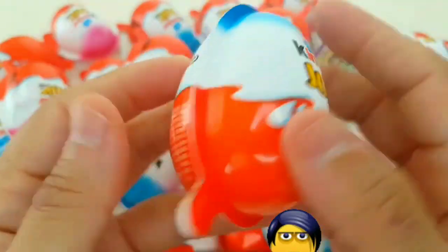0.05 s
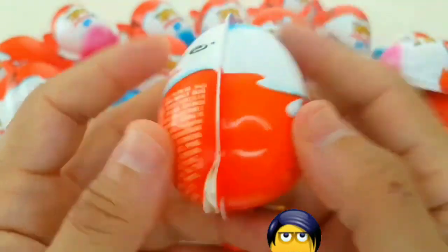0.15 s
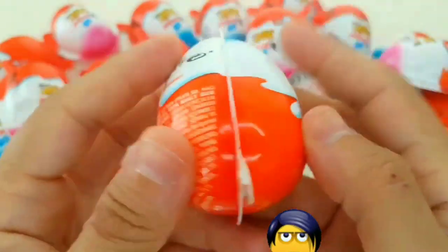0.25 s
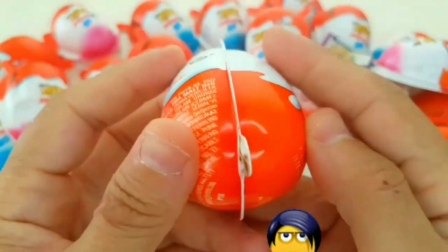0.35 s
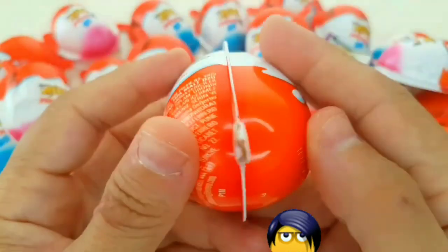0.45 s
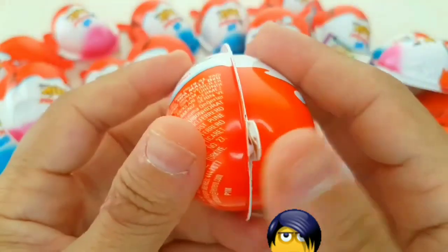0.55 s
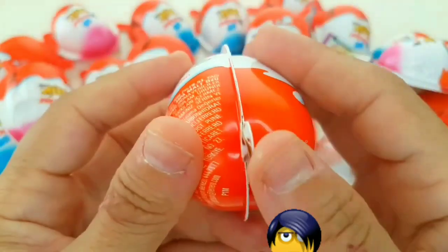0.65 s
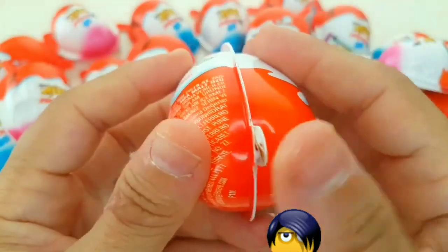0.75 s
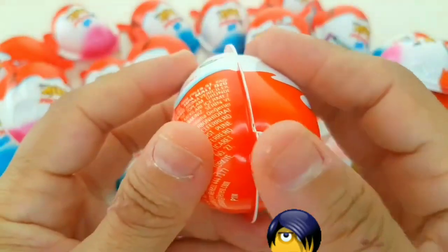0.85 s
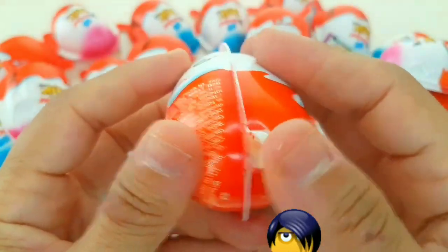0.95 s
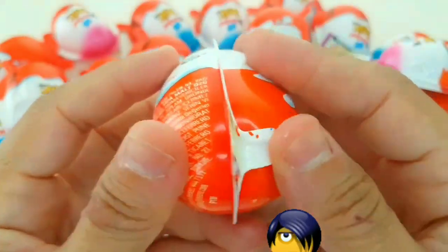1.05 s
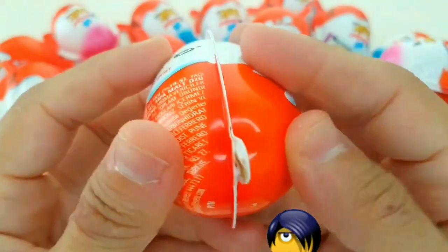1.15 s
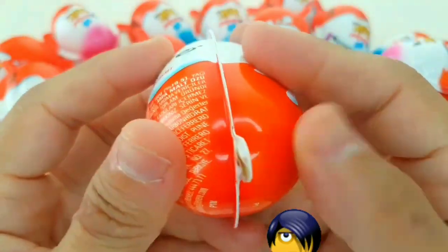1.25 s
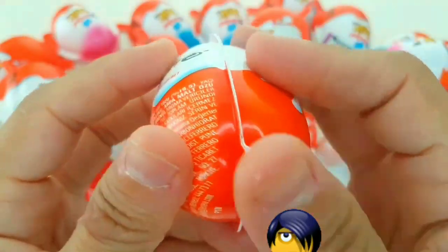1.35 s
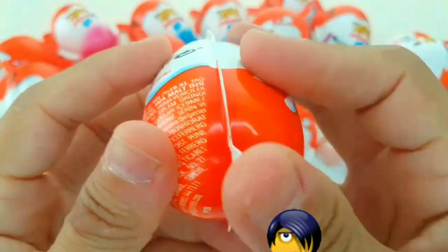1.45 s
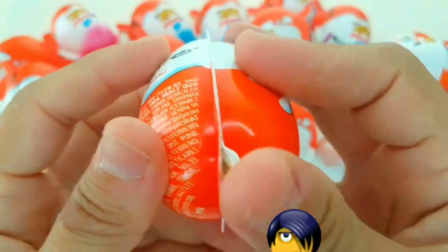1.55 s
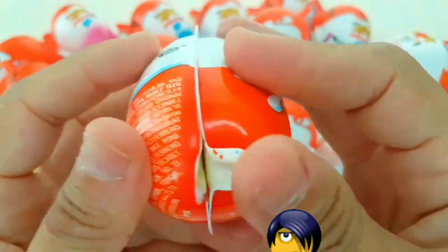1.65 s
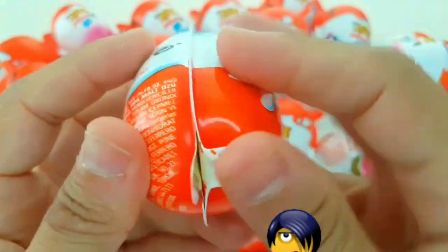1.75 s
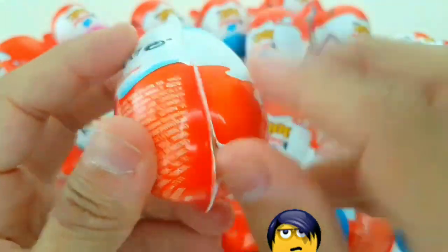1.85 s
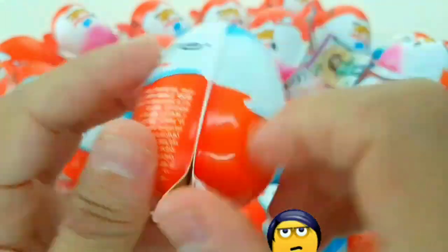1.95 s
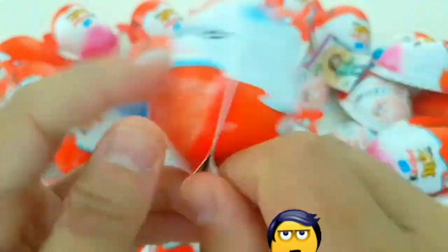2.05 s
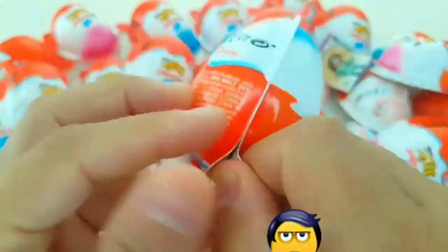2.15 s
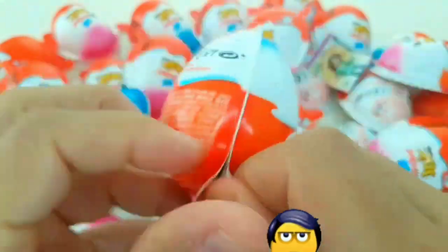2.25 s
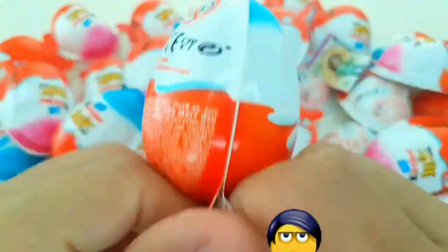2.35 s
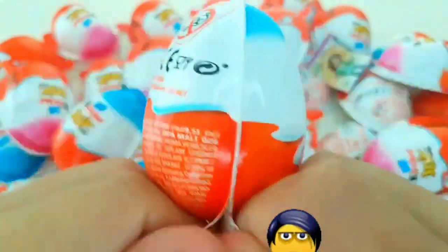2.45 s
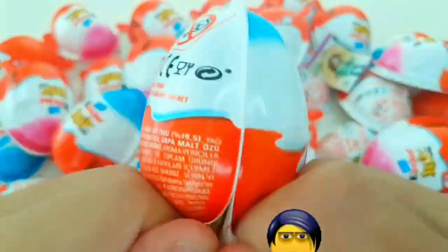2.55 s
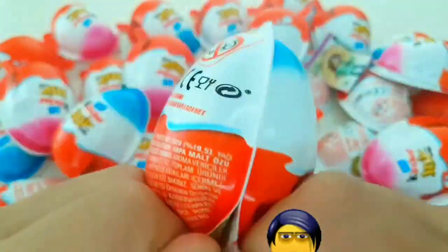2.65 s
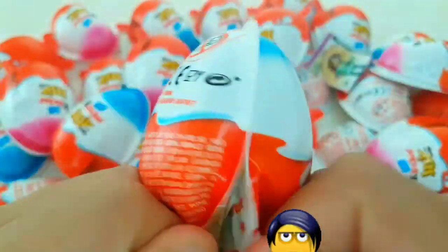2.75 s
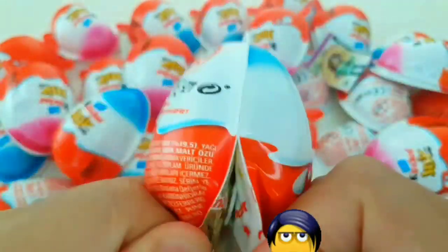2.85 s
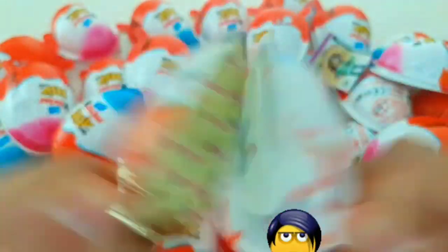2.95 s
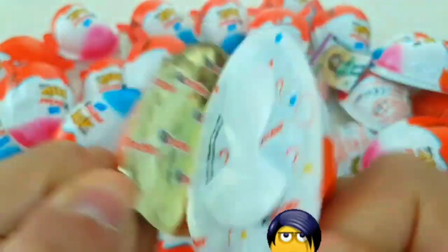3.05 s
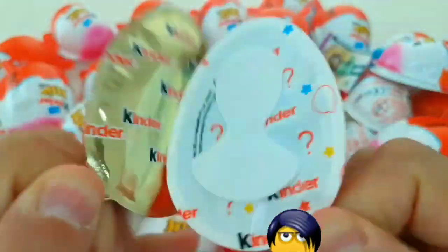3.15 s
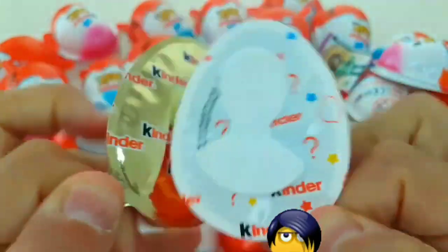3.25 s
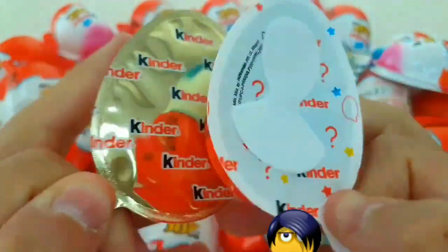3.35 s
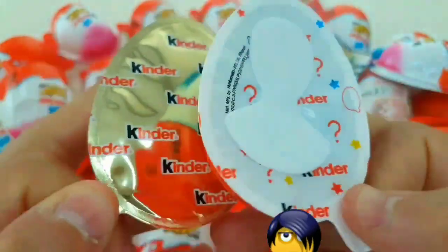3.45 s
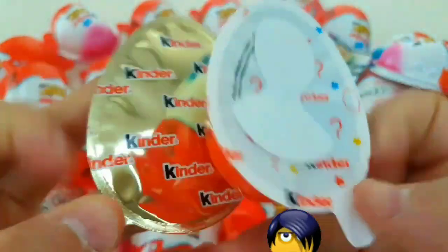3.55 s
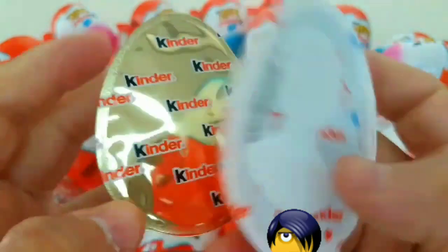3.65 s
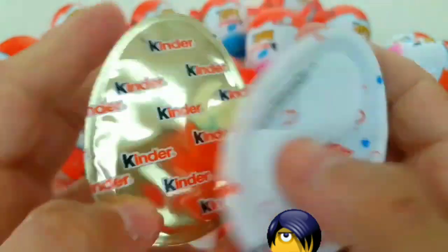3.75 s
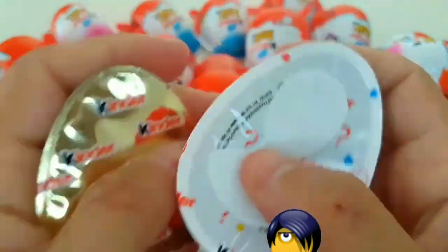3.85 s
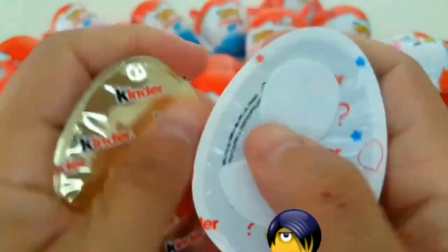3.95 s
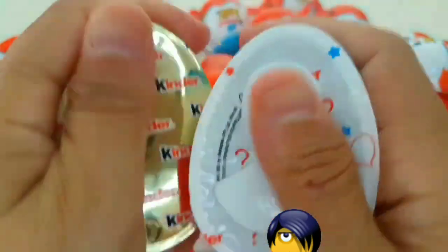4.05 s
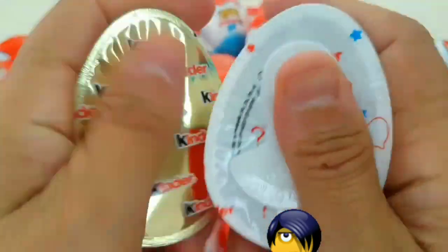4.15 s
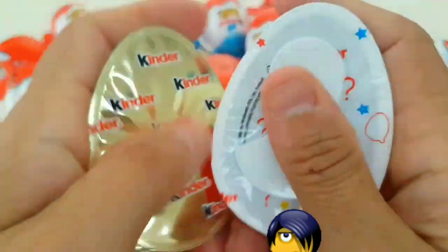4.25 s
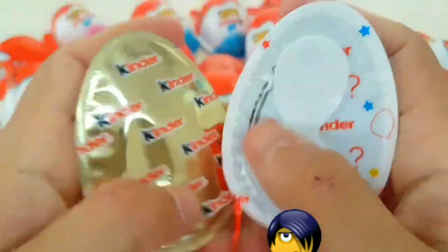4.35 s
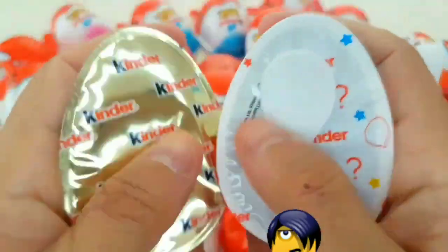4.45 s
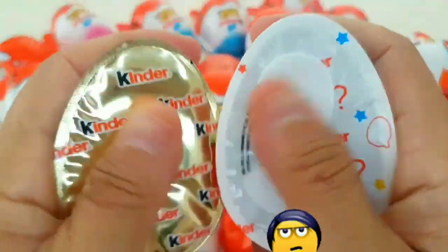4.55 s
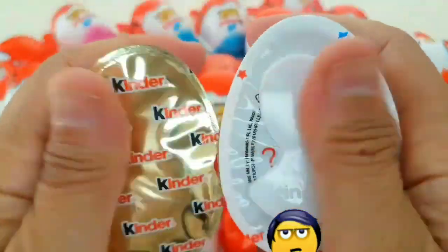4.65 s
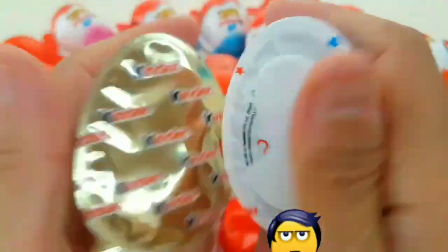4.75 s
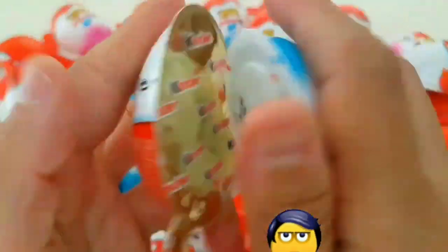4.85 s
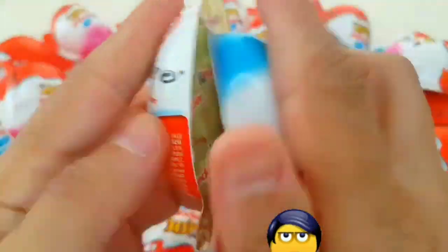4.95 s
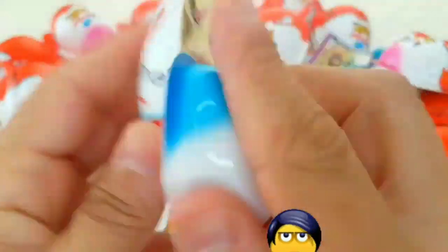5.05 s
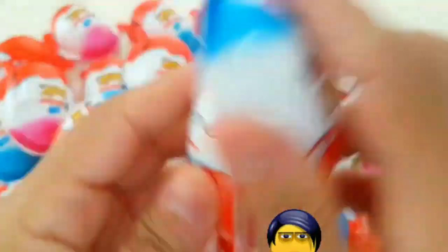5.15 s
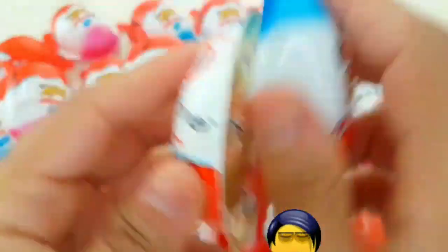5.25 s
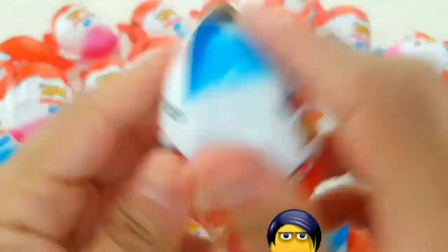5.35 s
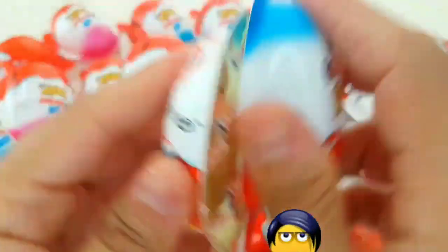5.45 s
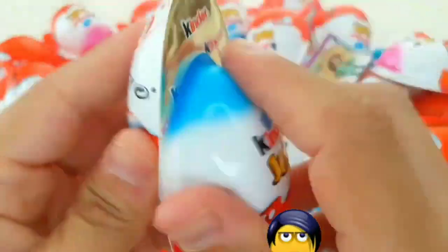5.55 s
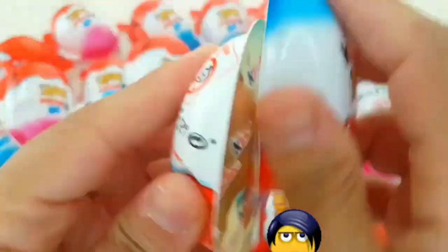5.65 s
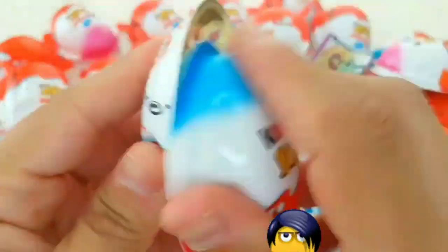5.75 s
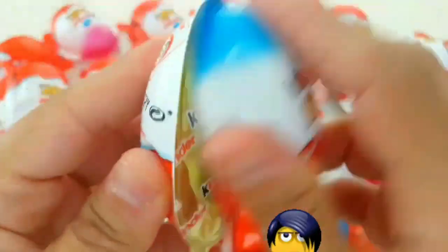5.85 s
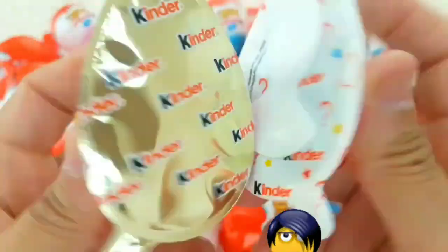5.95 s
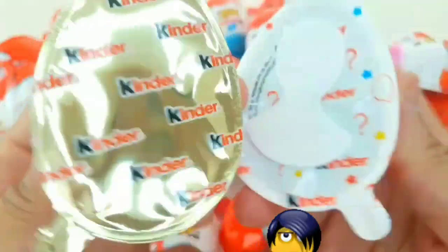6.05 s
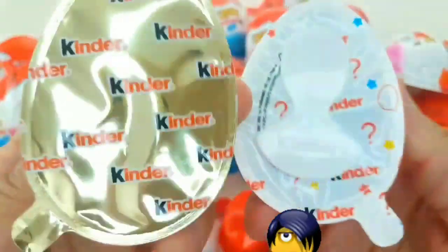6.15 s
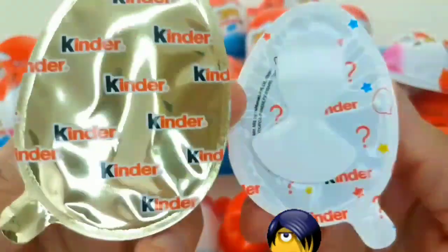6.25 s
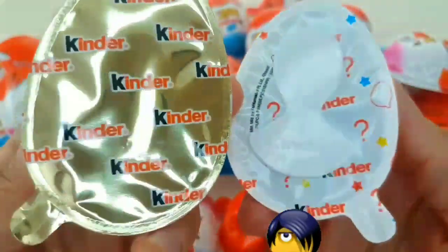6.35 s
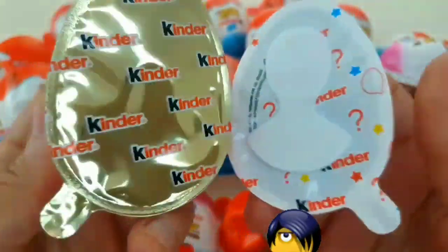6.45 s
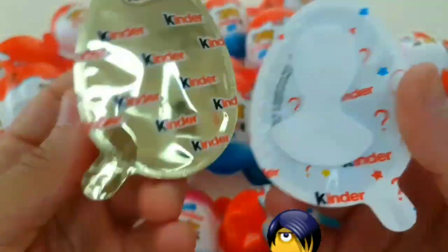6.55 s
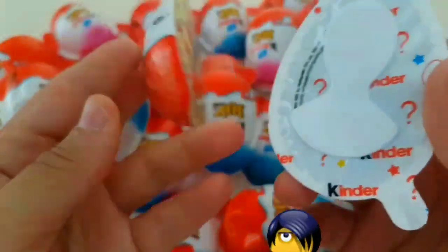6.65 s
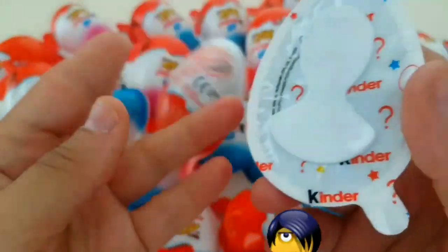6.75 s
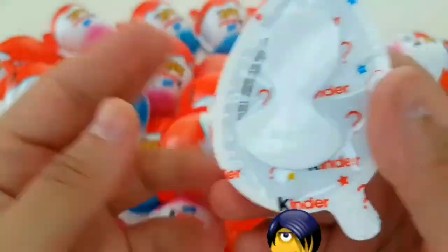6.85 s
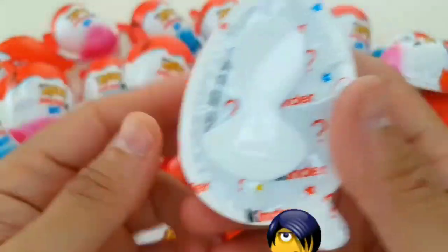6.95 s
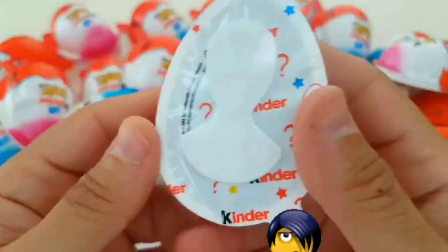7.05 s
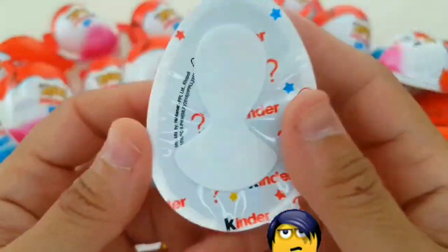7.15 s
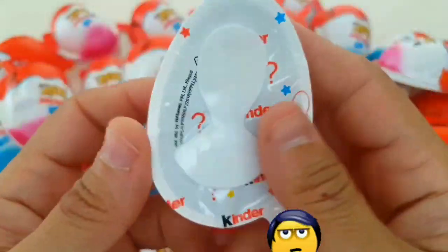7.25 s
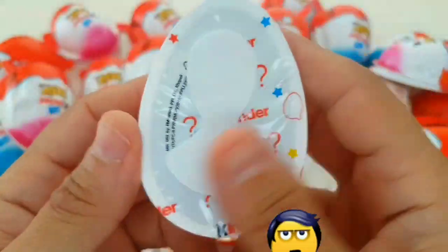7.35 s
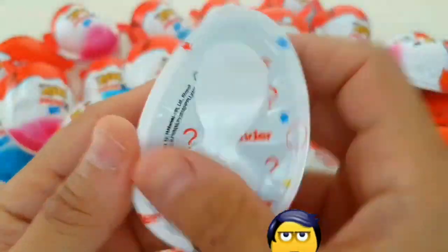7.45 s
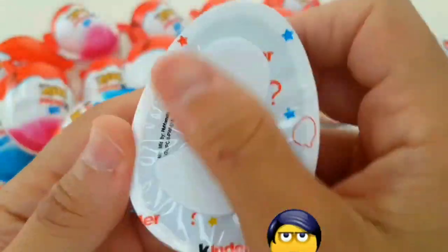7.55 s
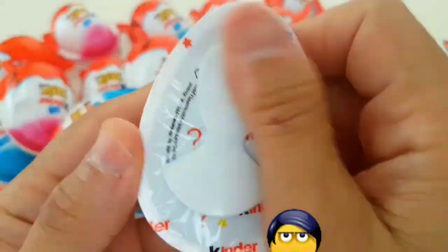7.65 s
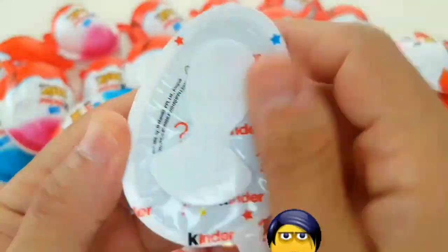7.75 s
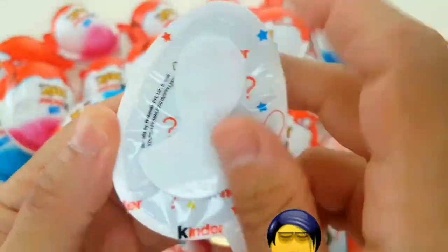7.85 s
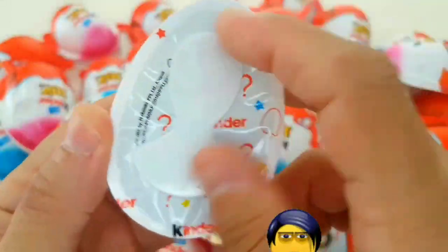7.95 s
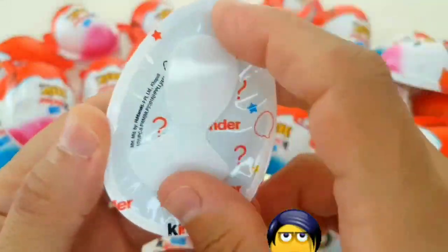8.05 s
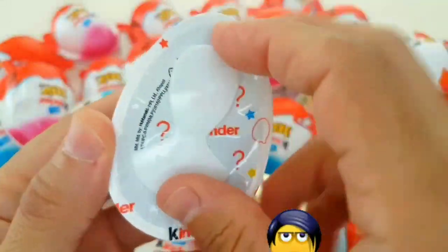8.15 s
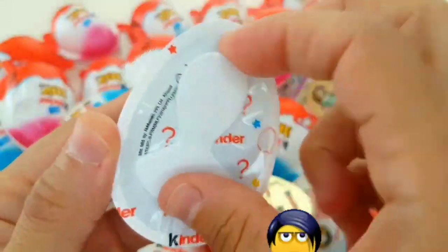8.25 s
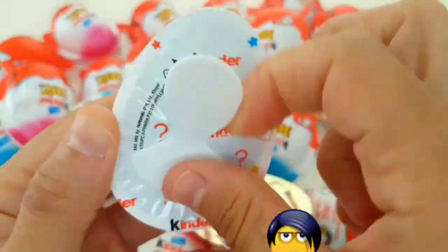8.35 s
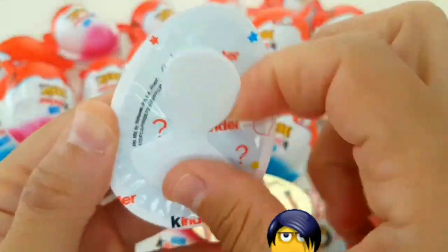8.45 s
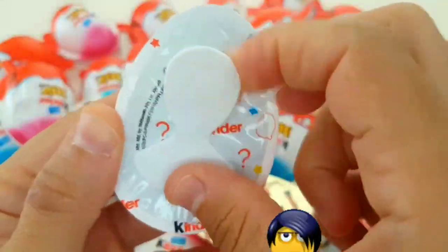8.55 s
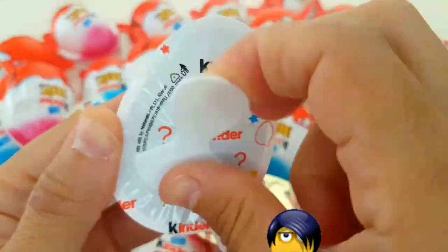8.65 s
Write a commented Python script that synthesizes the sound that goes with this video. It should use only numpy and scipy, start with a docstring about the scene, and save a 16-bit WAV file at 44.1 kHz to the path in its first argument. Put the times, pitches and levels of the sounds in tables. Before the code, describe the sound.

After near silence with two small pops, a loud plastic snap, then dense bright crackles and clicks of thin plastic and foil, dry and close.

```python
"""Thin plastic walls of a toy egg buckle close to a stereo microphone, as hands peel its seal, snap it open and
turn it. Each buckle rings for a few cycles under a short noise crack and a bright tick; foil snaps are mostly
crack. Between them random slips and creases make rubbing and crinkling, and the peeling film squeaks faintly
once. Cups knock on a table and puffs of air thump. Decaying noise adds a small bare room, over room tone and
rumble."""
import sys
import numpy as np
from scipy import signal
from scipy.fft import rfft, irfft, next_fast_len
from scipy.io import wavfile

SR = 44100
rng = np.random.default_rng(int(sys.argv[2]) if len(sys.argv) > 2 else 0)


def wav_record(signal):
    """Record a signal, one row per channel, as 16-bit PCM in the file named by sys.argv[1]."""
    frames = np.transpose(np.atleast_2d(signal))
    bounded = np.clip(frames, -1, 1)
    # unit amplitude maps onto the largest positive 16-bit level
    quanta = np.round(bounded * 32767).astype(np.int16)
    wavfile.write(sys.argv[1], SR, quanta)


N = 383229
TIME_S = np.arange(N) / SR
SHORT_S = np.arange(2048) / SR

# Buckles of the plastic walls. Each row: time in seconds, ring in Hz, ring level in dB, crack over ring in dB.
BUCKLES = [(1.0414, 4040, -23.5, -10), (1.1745, 1450, -20, -6.5), (2.4999, 1030, -35.5, -2.5),
           (2.705, 1430, -40.5, 5), (2.7706, 1400, -34.5, -4.5), (2.7803, 1800, -33, 0),
           (2.8063, 1300, -31.5, -4), (2.9864, 1650, -23.5, 5), (3.0258, 1455, -8, -5.5),
           (3.0514, 1540, -19, -5.5), (3.1207, 890, -21, -9), (3.249, 2480, -29.5, -2),
           (3.2772, 1900, -29, -5), (3.295, 1520, -30.5, 3.5), (3.3092, 1920, -34, 6),
           (3.431, 1500, -45, -15), (3.7996, 1034, -29.5, -3), (3.9186, 1680, -22, 2),
           (3.9844, 1910, -23.5, 3), (4.054, 2100, -20.5, -2.5), (4.0948, 1670, -28.5, 4),
           (4.1462, 1580, -20.5, -6), (4.2447, 2100, -27, -10), (4.2682, 1270, -28.5, 5),
           (4.33, 1100, -30, 8.5), (4.3928, 2200, -21, -3), (4.4004, 1820, -19, -15),
           (4.4178, 1930, -19.5, -6.5), (4.6142, 2260, -23, -18), (4.6589, 1650, -19, -7.5),
           (4.6711, 2085, -18, -6.5), (4.7074, 1900, -19, -9), (4.728, 1480, -25, 4),
           (4.7986, 1840, -15.5, -1), (4.8149, 1670, -20, -10), (4.8475, 1710, -19.5, -2),
           (4.8881, 1530, -20, -28), (4.9026, 1660, -11.5, -9.5), (4.92, 1650, -18, -13.5),
           (5.0097, 1680, -16.5, -4), (5.0238, 1600, -23.5, -7), (5.0782, 1350, -29.5, 1.5),
           (5.0917, 1670, -20, -9.5), (5.1047, 1400, -24.5, -3), (5.1247, 1420, -18.5, 0.5),
           (5.1523, 1840, -14, -2), (5.2145, 1200, -14.5, -1.5), (5.258, 1800, -13, -6.5),
           (5.2873, 1500, -12.5, -5.5), (5.3147, 880, -14, -11.5), (5.351, 950, -22.5, -11.5),
           (5.3957, 1790, -12.5, -5), (5.4082, 1740, -12, -11), (5.4185, 1880, -16, -12),
           (5.442, 1600, -22.5, -5.5), (5.4702, 2080, -16, -4), (5.531, 1340, -20.5, -12),
           (5.547, 1990, -14, -24), (5.625, 2050, -16, -5.5), (5.65, 1830, -14, -1.5),
           (5.7358, 1460, -13.5, -8), (5.8386, 2340, -11, -20.5), (5.869, 2070, -19, -5),
           (5.9005, 2220, -16, -9.5), (5.9578, 1340, -21.5, -10.5), (6.0046, 1740, -12.5, -10),
           (6.2328, 710, -36.5, -6), (6.2774, 1630, -30.5, 12.5), (6.3334, 1180, -28.5, 5.5),
           (6.8686, 1710, -19.5, -25), (6.886, 1750, -22.5, -7.5), (6.912, 1660, -19.5, -14),
           (6.9445, 790, -21, -8.5), (7.0491, 1770, -20, -16.5), (7.155, 1740, -32.5, -30),
           (7.4494, 850, -24.5, -11.5), (7.6021, 1820, -27, -3.5), (7.726, 1830, -29.5, 0),
           (7.7499, 1410, -15.5, 1.5), (7.8188, 1680, -20.5, -38), (8.3774, 970, -20, -3.5),
           (8.4001, 924, -17.5, -1), (8.447, 1560, -17, -6), (8.597, 1310, -24, 1),
           (8.6467, 1640, -13, -5.5), (8.6725, 1540, -14, -3), (8.6844, 1530, -20, 3)]
# Cracks of the foil and its seal. Each row: time in seconds, crack level in dB, tick level in dB.
FOIL_CRACKS = [(1.04, -28.5, -17), (1.1227, -46.5, -25.5), (1.1732, -16.5, -9.5), (1.2386, -18.5, -16.5),
               (1.6128, -60, -46.5), (2.5914, -36, -34.5), (2.686, -46.5, -32.5), (2.8443, -15.5, -21.5),
               (2.852, -21, -13), (2.8606, -17, -11.5), (2.87, -22, -19), (2.9198, -34.5, -17.5),
               (3.0064, -21.5, -12), (3.0147, -29, -24), (3.141, -23, -25), (3.1676, -22, -24),
               (4.1278, -13, -19.5), (4.3702, -24, -35), (4.4603, -26.5, -27.5), (4.7935, -18.5, -25),
               (5.1876, -21, -19), (5.233, -18, -16), (5.376, -19, -19), (5.678, -25, -18.5),
               (5.847, -20.5, -23), (5.863, -22.5, -26), (6.024, -18, -30), (6.0725, -12, -16.5),
               (6.517, -22, -30.5), (6.8265, -30.5, -34), (7.4498, -47, -31), (8.0011, -14, -23.5),
               (8.259, -33.5, -19), (8.4336, -25, -20), (8.5252, -19.5, -33), (8.5851, -17.5, -21)]
# Send of each snap to the room, as the cups are turned. Each row: time in seconds, send in dB.
FACING_SENDS = [(1.05, -5.5), (1.24, -3), (2.85, -5), (3.1, -15), (3.8, -4), (4.1, -14), (5.3, -2),
                (6.3, -1), (6.5, -14.5), (7.75, -9.5), (8.0, -8.5), (8.5, -17.5), (8.65, 0)]
# Crack spectrum. Each row: frequency in Hz, relative level in dB.
CRACK_SPECTRUM = [(200, -12.5), (700, -7), (2000, 2.5), (3600, 6), (6000, -5.5), (8500, -15),
                  (16000, -32.5)]
# Tick spectrum. Each row: frequency in Hz, relative level in dB.
TICK_SPECTRUM = [(3000, -15), (7000, -2), (10000, -5), (13200, -1.5), (16000, -2.5)]
# Finger strokes over shell and foil. Each row: end of swell in seconds, length in seconds, level in dB,
# brightness (gain above the 2.6 kHz split) in dB.
STROKES = [(0.01, 0.062, -56.5, 6), (0.188, 0.045, -52.5, 4.5), (0.25, 0.51, -68.5, 1.5),
           (1.843, 0.029, -61.5, 7), (1.968, 0.24, -60.5, 6.5), (2.358, 0.65, -65, 3),
           (2.851, 0.027, -31.5, 3.5), (3.018, 0.034, -18, 2), (3.083, 0.076, -31.5, -1),
           (3.277, 0.012, -40, -6), (3.551, .03, -59, -2), (3.639, 0.019, -55, 5.5),
           (3.796, 0.93, -51, -4.5), (4.003, 0.11, -36.5, -5.5), (4.337, .08, -32, -9), (4.46, 1, -47, -3),
           (5.141, 0.32, -25, -3.5), (5.492, 0.12, -36, 1), (5.628, 0.19, -32, -6),
           (5.833, 0.035, -32.5, 4), (5.922, 0.18, -40.5, -4), (6.727, 0.017, -56, 6.5),
           (6.826, 0.17, -33, -16), (6.992, 0.17, -48, -14.5), (7.18, 0.73, -57.5, -7),
           (7.526, 0.43, -55, -1.5), (8.205, 0.018, -49.5, 0), (8.373, 0.15, -39, -10),
           (8.635, .06, -35.5, -2.5)]
# Rubbing spectrum. Each row: frequency in Hz, relative level in dB.
FRICTION_SPECTRUM = [(150, -22), (400, -17), (800, -3.5), (1600, -4), (2800, 0.5), (10000, -6.5),
                     (13500, -4.5), (16000, -19.5)]
# Dull knocks of cups and knuckles. Each row: time in seconds, pitch in Hz, knock level in dB, table gain in dB.
KNOCKS = [(1.174, 380, -39, -55), (1.239, 400, -31.5, -65), (3.026, 235, -10, -63), (3.051, 200, -24, -69),
          (6.821, 173, -28.5, -41), (6.945, 340, -26, -40), (7.048, 208, -41.5, -76),
          (7.156, 310, -30, -60), (7.448, 410, -27, -40.5)]
# Table modes. Each row: frequency in Hz, relative level in dB, 60 dB decay in seconds.
TABLE_MODES = [(70, -5, .45), (114, 0, .7), (146, -4, .4)]
# Air pushed at the microphone as the halves part. Each row: time in seconds, pitch in Hz, level in dB.
PUFFS = [(3.0267, 125, -5), (3.052, 70, -20.5)]
# Room echo spectrum. Each row: frequency in Hz, relative level in dB.
ROOM_COLOUR = [(200, -1), (1200, -4.5), (3500, -6.5), (14000, -6.5)]
# Room decay. Each row: frequency in Hz, 60 dB decay in seconds.
ROOM_T60_S = [(200, 0.32), (3000, 0.31), (14000, 0.28)]
# Room tone spectrum. Each row: frequency in Hz, relative level in dB.
ROOM_TONE_SPECTRUM = [(15, -19), (28, 5), (55, -14), (130, -31), (240, -8.5), (350, -10), (550, -15.5),
                      (1200, -20.5), (9000, -31.5), (15000, -28.5)]
# Rumble of the hands over time. Each row: time in seconds, gain in dB.
HANDS_GAIN = [(0.0, -79), (0.41, -78), (1.26, -73.5), (2.49, -60), (2.98, -51.5), (3.48, -88.5),
              (5.52, -56), (6.02, -52), (6.75, -77.5), (6.97, -53.5), (8.03, -64), (8.69, -61)]
# Rumble spectrum. Each row: frequency in Hz, relative level in dB.
RUMBLE_SPECTRUM = [(20, -4), (60, 3.5), (110, 0.5), (250, 1), (450, -11), (1000, -28), (4000, -66.5)]

LEAD_S = .003  # short noise rise before the crack's peak
PORT_LAG_S = .00016  # sound reaches the left port first
FOIL_RING_HZ, FOIL_RING_RE_CRACK_DB = 1596, -14  # wall under the foil
BUCKLE_TICK_RE_CRACK_DB = -10.5
STROKE_ATTACK_S, STROKE_RELEASE_S, STROKE_SAG_DB = 0.018, 0.037, -0.5
RESTING_DB = -83  # fingers that only hold the egg
ROOM_TONE_DB, RUMBLE_BASE_DB = -62, 3
TOP_HZ = 15600


def snaps():
    """All snaps, close up, and what each throws into the room as its wall faces."""
    near, thrown = np.zeros((2, N)), np.zeros(N)
    # summed over all directions, a crack has a smooth spectrum
    impulse = signal.unit_impulse(len(SHORT_S), 32)
    crack = burst(colour(impulse, CRACK_SPECTRUM), 0)
    tick = burst(colour(impulse, TICK_SPECTRUM), 0)
    for s, hz, ring_db, crack_db, tick_db in snap_parts():
        add(near, s - LEAD_S, snap(hz, ring_db, crack_db, tick_db))
        send_db = np.interp(s, *np.transpose(FACING_SENDS))
        wall = burst(ring(hz, cycles=11.0), ring_db - 6.5)  # the wall's ring, slightly shorter, as sent to the room
        whole = wall + crack * undb(crack_db) + tick * undb(tick_db)
        add(thrown, s, whole * undb(send_db))
    return near, thrown


def snap_parts(pitch_spread=0.16):
    """Each snap as (s, ring Hz, ring dB, crack dB, tick dB): foil mostly cracks, a wall mostly rings."""
    for s, crack_db, tick_db in FOIL_CRACKS:
        hz = FOIL_RING_HZ * np.exp(pitch_spread * rng.standard_normal())
        yield s, hz, crack_db + FOIL_RING_RE_CRACK_DB, crack_db, tick_db
    for s, hz, ring_db, sharp_db in BUCKLES:
        crack_db = ring_db + sharp_db
        yield s, hz, ring_db, crack_db, crack_db + BUCKLE_TICK_RE_CRACK_DB


def snap(hz, ring_db, crack_db, tick_db):
    """A patch of wall flips: its main mode rings with weaker neighbours, and the crease cracks."""
    lag_s = PORT_LAG_S * rng.uniform(.7, 1.3)
    neighbours_hz = hz * np.array([.42, .68, 1.4]) * np.exp(.08 * rng.standard_normal(3))
    neighbours = sum(ring(f, cycles=12.3, phase=2 * np.pi * rng.random()) for f in neighbours_hz)
    wall = ring(hz, cycles=12.6) + undb(-21.5) * neighbours
    wall = wall * (1 - np.exp(-SHORT_S / 0.00032))  # soft onset
    wall = np.roll(wall, int(LEAD_S * SR))
    crack = fracture(CRACK_SPECTRUM, t60_s=.007, tail_db=-22)
    tick = fracture(TICK_SPECTRUM, t60_s=.0055, tail_db=-24)
    return (burst(ports([wall, wall], 5.2, lag_s, 0.97), ring_db)
            + burst(ports(crack, 3.3, lag_s, 0.64), crack_db)
            + burst(ports(tick, 8, lag_s, .6), tick_db))


def ring(hz, cycles, phase=0):
    """A mode that dies by 60 dB in so many cycles."""
    return np.sin(2 * np.pi * hz * SHORT_S + phase) * fade(SHORT_S * hz, cycles)


def fracture(spectrum, t60_s, tail_db, rise_db=-16):
    """Coloured noise rises briefly, peaks and leaves a faint tail."""
    t_s = SHORT_S - LEAD_S
    after_s = np.maximum(t_s, 0)
    onset = np.minimum(after_s / .0007, 1) ** 2
    release = onset * (fade(after_s, t60_s) + undb(tail_db) * fade(after_s, .03))
    rise = undb(rise_db) * np.exp(-abs(t_s) / LEAD_S * 2)
    return colour(rng.standard_normal((2, len(SHORT_S))), spectrum) * (release + rise)


def crinkles(count=400, scatter_db=4, cap_db=-29):
    """Small creases give way at random, as hard as the fingers are working."""
    out = np.zeros((2, N))
    level_db, bright_db = strokes()
    for k, (when, pitch, size) in enumerate(rng.random((count, 3))):
        i = int((k + when) / count * (N - 1))
        ring_db = min(level_db[i] + scatter_db * (2 * size - 1), cap_db)
        crack_db = ring_db + bright_db[i] / 2
        add(out, i / SR - LEAD_S, snap(1100 * 2 ** pitch, ring_db, crack_db, crack_db - 0.5))
    return out


def rubbing(slips_per_s=3500, scatter_db=3, wander_db=9.0):
    """Tiny slips of skin and foil; each one shakes the bands of the shell in its own proportion."""
    level_db, bright_db = strokes()
    slips = rng.random(N) < slips_per_s / SR
    slips = slips * undb(scatter_db * np.minimum(rng.exponential(size=N), 5))
    pair = np.zeros((2, N))
    for hz in np.geomspace(200, 14000, 13):
        band = signal.butter(1, [hz / 1.2, hz * 1.2], "band", fs=SR, output="sos")
        # the grip keeps changing which parts of the shell are free to ring
        grip = np.interp(TIME_S, np.linspace(0, TIME_S[-1], num=400), rng.standard_normal(size=400))
        shaken = signal.sosfilt(band, slips * rng.standard_normal((2, N)))
        pair += shaken * undb(wander_db * grip)
    pair = colour(pair, FRICTION_SPECTRUM)
    body = signal.sosfiltfilt(signal.butter(3, 2600, fs=SR, output="sos"), pair)
    low = level(ports(body, 1.3, PORT_LAG_S, 0.47), -2.5)
    high = level(ports(pair - body, 1.6, PORT_LAG_S, 0.43), -1.3)
    return (low + high * undb(bright_db)) * undb(level_db)


def strokes():
    """Finger level and brightness in dB per sample: strokes swell, sag, lift, and add in power."""
    power, bright = undb(RESTING_DB) ** 2, 0
    for s, length_s, db, bright_db in STROKES:
        corners_s = np.cumsum([s - STROKE_ATTACK_S, STROKE_ATTACK_S, length_s, STROKE_RELEASE_S])
        stroke = np.interp(TIME_S, corners_s, [0, undb(db), undb(db + STROKE_SAG_DB), 0]) ** 2
        power = power + stroke
        bright = bright + stroke * bright_db
    return 10 * np.log10(power), bright / power


def squeak(db=-63):
    """The peeling film squeaks: noise through a narrow resonance gives a faint, rough note."""
    s, length_s, hz, width_hz = 2.0, .32, 1210, 70
    n = int(length_s * SR)
    note = signal.lfilter(*signal.iirpeak(hz, hz / width_hz, fs=SR), rng.standard_normal(n))
    out = np.zeros((2, N))
    add(out, s, level(note * np.hanning(n) ** .5, db))
    return out


def knocks():
    """Soft blows ring the cups briefly and set the table humming; puffs of air hit the ports."""
    out, t_s = np.zeros((2, N)), np.arange(SR // 2) / SR
    table = sum(undb(db) * np.sin(2 * np.pi * f * t_s) * fade(t_s, t60_s) for f, db, t60_s in TABLE_MODES)
    for s, hz, knock_db, table_db in KNOCKS:
        cup = ring(hz, cycles=2.1) + .5 * ring(2 * hz, cycles=1.9) - .5 * ring(hz / 2, cycles=2.6)
        add(out, s, burst(cup, knock_db))
        add(out, s, undb(table_db) * table)
    for s, hz, db in PUFFS:
        puff = ring(hz, cycles=1.3) * np.linspace(1, 0, len(SHORT_S))
        add(out, s, burst(np.outer([1, undb(-18)], puff), db))  # mostly left
    return out


def room(x, first_s=0.0011, build_s=0.00097):
    """Diffuse echo of decaying noise: treble dies first, only the bass is alike at both ports."""
    t_s = np.arange(int(SR * .7)) / SR
    hz = np.fft.rfftfreq(len(t_s), 1 / SR)
    left, other = rfft(rng.standard_normal((2, len(t_s))))
    alike = 1 / (1 + (hz / 600) ** 2)
    right = alike * left + np.sqrt(1 - alike ** 2) * other
    field = np.array([left * undb(0.8), right]) * undb(along(ROOM_COLOUR, hz))
    edges_hz = np.geomspace(60, SR / 2, 9)
    echo = 0
    for lo, hi in zip(edges_hz, edges_hz[1:]):
        band = irfft(field * ((hz >= lo) & (hz < hi)), len(t_s))
        echo = echo + band * fade(t_s, along(ROOM_T60_S, np.sqrt(lo * hi)))
    echo = echo * np.clip((t_s - first_s) / build_s, 0, 1) * undb(-28.5)
    return signal.fftconvolve(x[None], echo, axes=1)[:, :N]


def background():
    """Coloured noise: steady quiet room tone and the varying rumble of moving hands."""
    tone = ports(rng.standard_normal((2, N)), 0.77, 0, 0.05)
    tone = level(colour(tone, ROOM_TONE_SPECTRUM), ROOM_TONE_DB)
    rumble = ports(rng.standard_normal((2, N)), 0, 0, 0.82)
    rumble = level(colour(rumble, RUMBLE_SPECTRUM), RUMBLE_BASE_DB)
    return tone + rumble * undb(np.interp(TIME_S, *np.transpose(HANDS_GAIN)))


def undb(db):
    """Decibels to gain."""
    return 10 ** (np.asarray(db) / 20)


def along(points, hz):
    """Read (Hz, value) points on a log-frequency axis."""
    f, value = np.transpose(points)
    return np.interp(np.log(np.maximum(hz, 1)), np.log(f), value)


def colour(x, points):
    """Filter x by a gain curve of (Hz, dB) points."""
    n = x.shape[-1]
    size = next_fast_len(n)
    gain = undb(along(points, np.fft.rfftfreq(size, 1 / SR)))
    return irfft(rfft(x, size) * gain, size)[..., :n]


def level(x, db):
    """Set the rms level."""
    return x * undb(db) / np.sqrt(np.mean(x ** 2))


def burst(x, db):
    """Set the energy of a short sound, as its level over 5 ms."""
    energy = np.mean(np.sum(x ** 2, axis=-1))
    return x * undb(db) / np.sqrt(energy / (SR / 200))


def fade(t, t60):
    """Exponential decay by 60 dB in t60, in the unit of t."""
    return np.exp(-np.log(1000) * t / t60)


def add(out, s, x):
    """Mix x into out at time s."""
    i = max(int(s * SR), 0)
    out[..., i:i + x.shape[-1]] += x[..., :max(N - i, 0)]


def ports(pair, left_db, lag_s, alike):
    """Two signals become a left and a right that lags and is partly alike."""
    alike = np.clip(alike, 0, 1)
    right = alike * pair[0] + np.sqrt(1 - alike ** 2) * pair[1]
    late = np.pad(right, (int(abs(lag_s) * SR), 0))[:len(right)]
    return np.array([pair[0] * undb(left_db), late])


def scene():
    """Snaps, crinkles, rubbing and knocks, close up and through the room, over the background."""
    near, thrown = snaps()
    rub, low = rubbing() + crinkles(), knocks()
    shell = near + rub + room(thrown + undb(-4.5) * rub[0])
    # the shell's snaps and rubbing carry no deep bass
    shell = signal.sosfilt(signal.butter(2, 190, "high", fs=SR, output="sos"), shell)
    return shell + low + room(undb(-7) * low[1]) + squeak() + background()


def record(dry):
    """The recorder clips peaks beyond full scale, then a steep low-pass cuts the top."""
    return signal.sosfilt(signal.ellip(8, .2, 70, TOP_HZ, fs=SR, output="sos"), np.clip(dry, -1, 1))


dry = scene()
out = record(dry)
wav_record(out)
```